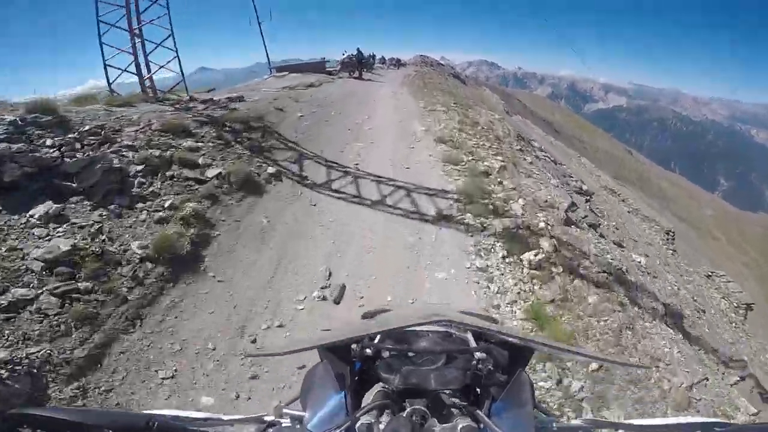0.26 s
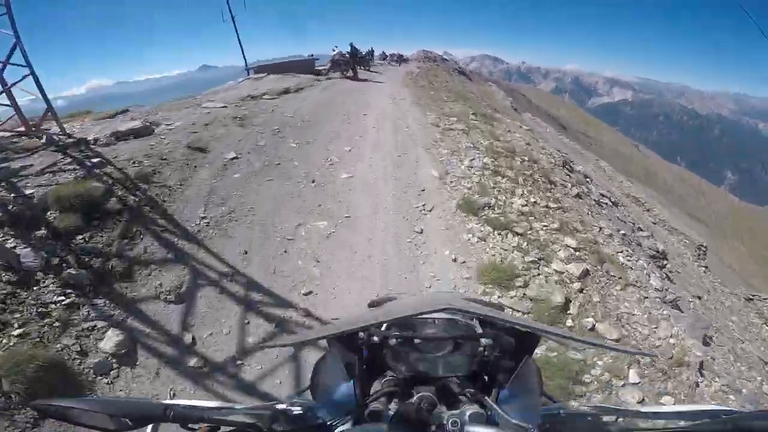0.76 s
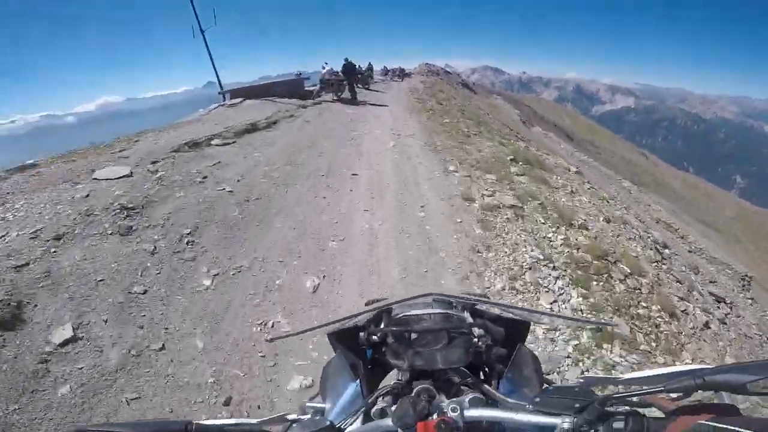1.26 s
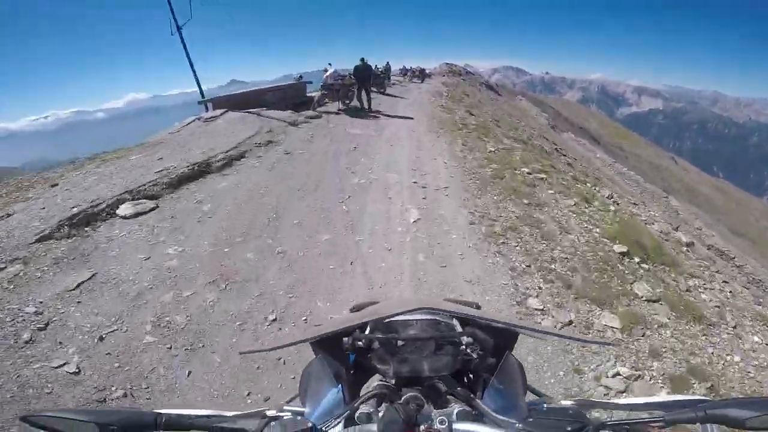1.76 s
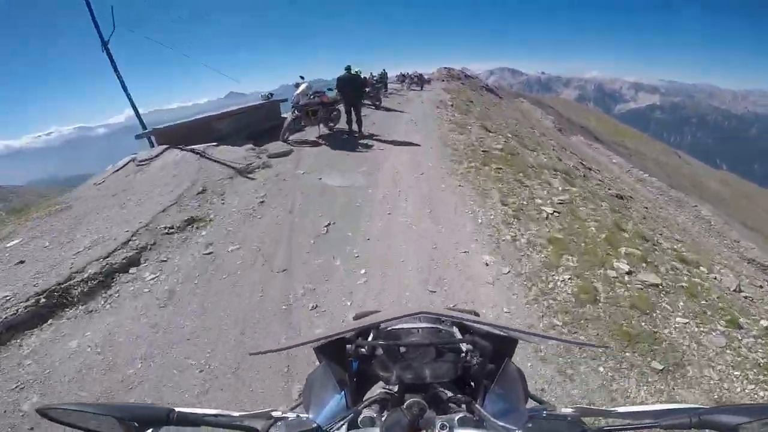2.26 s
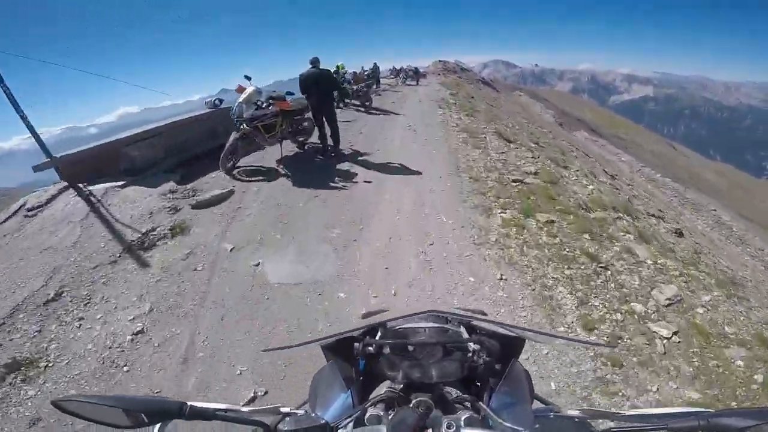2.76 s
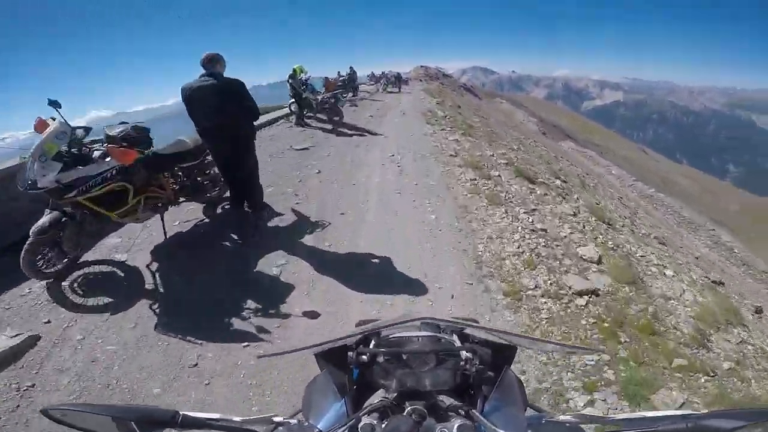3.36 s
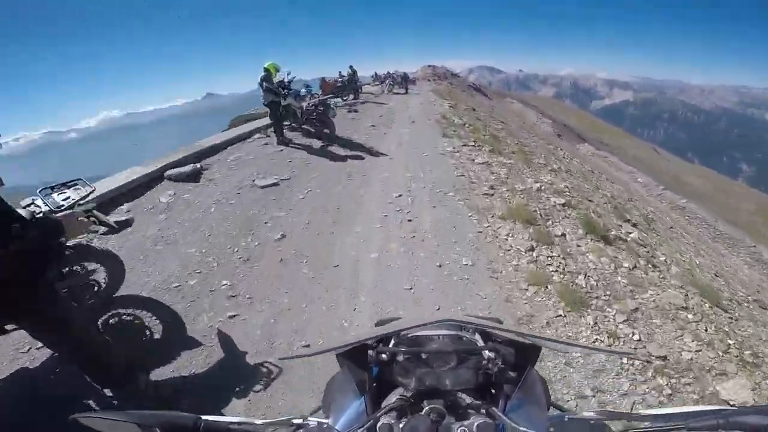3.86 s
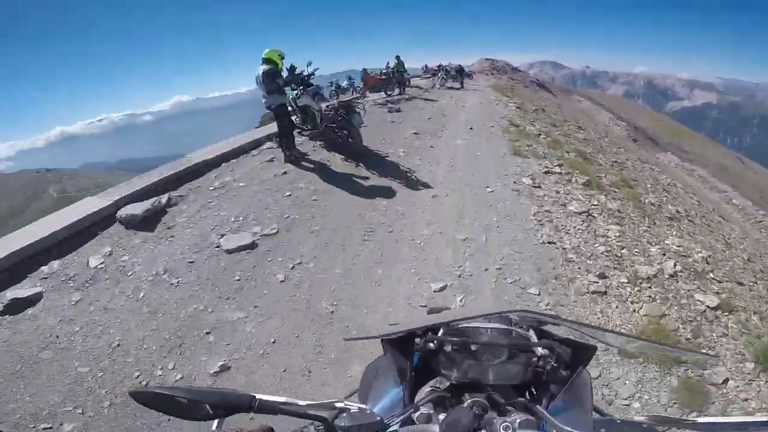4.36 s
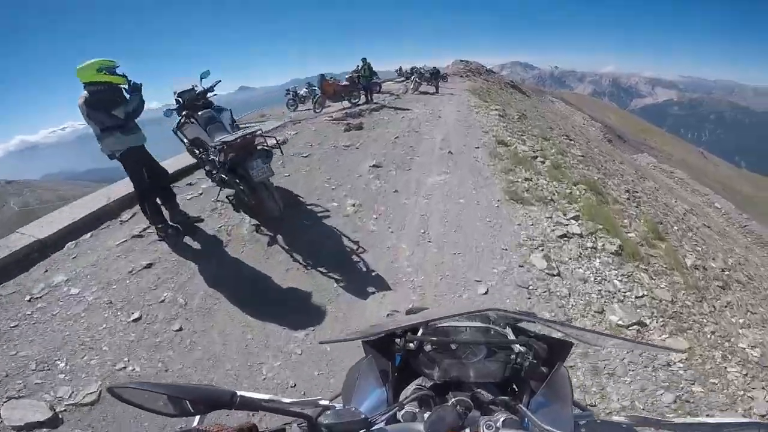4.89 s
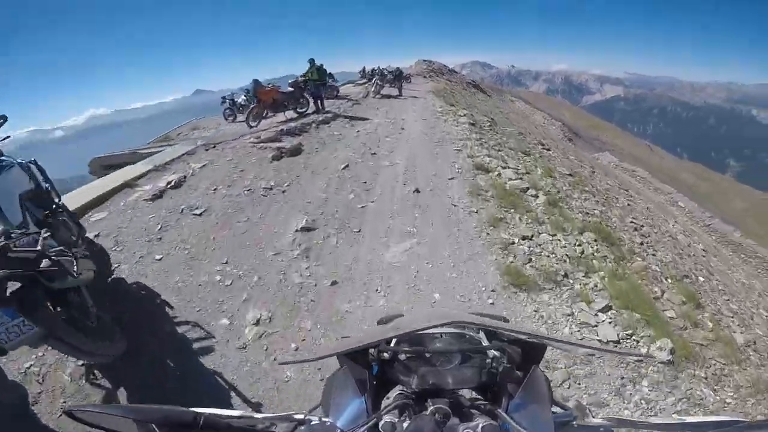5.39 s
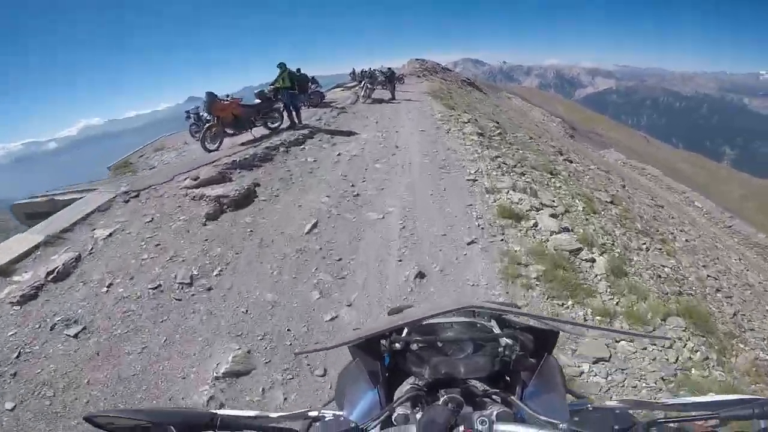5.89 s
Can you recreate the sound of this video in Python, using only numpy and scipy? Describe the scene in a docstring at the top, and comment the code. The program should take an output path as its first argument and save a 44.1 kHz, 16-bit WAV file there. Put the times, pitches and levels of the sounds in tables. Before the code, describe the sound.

Close up from the rider's position outdoors, a motorcycle engine pulls at low, wavering revs as its tyres spray gravel and flick small stones. After one hollow knock, the revs fall gradually to a soft, chugging idle with ticking valves, before rising a little again. A light crunch of gravel and a low rumble of wind and tyres continue throughout.

```python
"""A motorcycle engine, heard from the rider's helmet, climbs a loose gravel track at low revs,
eases to idle and picks up again. Once a turn, exhaust and intake pulses excite the resonances of
silencer and airbox; valve impacts rattle the casing and the chain whirs at multiples of crank speed.
Gravel crunches under the tyres over a rumble of wind, a few stones click away, and the bike
knocks once as the throttle closes."""
import sys
import numpy as np
from scipy import signal
from scipy.fft import rfft, irfft
from scipy.io import wavfile
from scipy.ndimage import uniform_filter1d

SR = 44100
rng = np.random.default_rng(int(sys.argv[2]) if len(sys.argv) > 2 else 0)


def inscribe(sig):
    """Save sig as 16-bit PCM at rate SR to the path in sys.argv[1].

    A 1-D sig is mono; a 2-D sig holds one channel per row.
    Samples are clipped to [-1, 1] before scaling.
    """
    pcm = np.round(np.clip(np.atleast_2d(sig).T, -1, 1) * 32767)
    wavfile.write(sys.argv[1], SR, pcm.astype(np.int16))


N = 270333
T = np.arange(N) / SR
HZ = np.arange(N + 1) * SR / (2 * N) + 1e-6

# crank speed: t/s, f/Hz
CRANK_SPEED = [(0.0, 30.92), (0.13, 35.02), (0.25, 29.68), (0.43, 33.37), (0.64, 32.02), (0.9, 32.8),
               (1.46, 32.12), (1.56, 31.46), (1.8, 31.66), (2.03, 27.27), (2.36, 25.17), (2.97, 23.48),
               (3.19, 21.93), (3.45, 22.22), (3.82, 20.36), (5.11, 20.67), (5.47, 25.66), (6.13, 25.51)]
# resonances of the silencer (deep, barking) and airbox: f/Hz, bandwidth/Hz, level/dB, polarity
SILENCER_MODES = [(51.1, 10.45, 14, -1), (113, 29, 6.5, 1)]
BARK_MODES = [(193.5, 7.8, -3, -1), (233, 45, 11.5, 1), (288.4, 20, 1.5, 1), (354, 40, -6, 1)]
AIRBOX_MODES = [(42, 135.6, 6.18, 1), (108, 98.5, 3.44, -1)]
# valve gear blows in the two-turn cycle: position/turns, level/dB, decay/turns
VALVE_BLOWS = [(.1, -13, .12), (.5, -7, .15), (.78, -11, .12), (1.07, -11, .08), (1.48, 0, .14),
               (1.62, -4, .2)]
# resonances of the casing, steel parts, chain cover and knocked part: f/Hz, bandwidth/Hz, level/dB
CASING_MODES = [(933, 47, -6), (1117, 76, -15), (1525, 118, 3), (2070, 230, -4.5)]
STEEL_MODES = [(2780, 210, 3), (3846, 290, 1.5), (4130, 43, 3), (4497, 290, 3.5), (4970, 55, 5.5),
               (5330, 39, -2), (6050, 250, -0.5), (6630, 670, -4.5), (9670, 660, -12)]
COVER_MODES = [(486, 30, 0)]
HOLLOW_MODES = [(775, 130, -1), (900, 70, 9), (983, 35, 12), (1150, 84, -26)]
# chain meshing tones: multiple of crank speed, level/dB
CHAIN_ORDERS = [(20, -11), (21, 0), (22, -2), (42, 9), (60, 8)]
# spectra of exhaust gas, engine casing, gravel, and wind with tyre rumble: f/Hz, level/dB
GAS_SPECTRUM = [(200, -1), (330, -0.5), (420, -6.5), (520, 1), (640, -11.5), (800, -13), (1500, -22),
                (2800, -20.5), (5000, -39), (12000, -49)]
CASING_SPECTRUM = [(200, 3.5), (390, -2.5), (560, 2), (780, -6.5), (980, 2), (1300, -2), (1550, -3),
                   (2150, -6), (2400, -14), (4000, -16), (6500, -18.5), (9000, -35.5), (14000, -52)]
GRAVEL_SPECTRUM = [(300, 11.5), (900, 4.5), (2000, 6), (2800, -0.5), (3900, 5), (4700, -8), (5600, -1.5),
                   (6600, 1.5), (8000, -11), (10000, -12), (11200, -21), (13500, -22), (15000, -36)]
RUMBLE_SPECTRUM = [(12, 0), (25, -1), (70, -3), (150, -8), (220, -10), (320, -18), (500, -28), (1500, -48),
                   (6000, -90)]
# stones flung by the tyres, and a dull thunk at 0.51 s: t/s, relative peak level/dB, f/Hz, decay/s
SHORT_CRACKS = [(0.035, -22, 4960, 0.0056), (0.078, -31, 5270, 0.0046), (.097, -35, 5000, 0.0034),
                (0.1148, -22.5, 4700, 0.0057), (0.129, -35, 3960, .004), (0.509, -25, 1240, 0.003),
                (.895, -27, 1200, 0.0015), (1.365, -28, 4360, 0.0055), (3.087, -42, 4470, 0.0024)]
# a hollow knock and its rebounds: t/s, relative level/dB
KNOCK_IMPACTS = [(1.7924, 9), (1.7981, -1), (1.804, 8.5), (1.8137, -3)]
# level laws: idle level/dB, revs slope/(dB/Hz), acceleration slope/(dB s/Hz), overrun gain/dB
THROB_LAW = (-19.0, 0.2585, .1, -0.47)
BARK_LAW = (-34, 0.47, 0.0469, 0.63)
INTAKE_LAW = (-4.5, 0.69, -0.13, .8)  # relative to the exhaust
CLATTER_LAW = (-34.5, 0.1619, 0.0557, 1.1)
CHAIN_LAW = (-43, -0.07, 0.14, 4)
GRAVEL_LAW = (-42, 0.4062, 0.0532, -0.7)

IDLE_HZ = 20.5
OVERRUN_HZ_PER_S = 2.7  # the wheel drives the engine fully once the revs fall this fast
THROTTLE_S, CHAIN_SLACK_S = 0.33, 0.483  # time for the throttle to act and the slack to change
SCATTER_DB, JITTER_S, UNEVEN_DB_PER_HZ = 1.05, .00028, -.35  # firings steady as the revs rise
WAVER_TURNS_PER_HZ, WAVER_PER_S = .0011, 9  # bumps make the crank run ahead and fall back
SPRAY_DB, SPRAY_SHAKE_DB = 1.5, 5  # wheel slip sprays gravel and jolts the casing


def undb(db):
    """Amplitude ratio of a level in decibels."""
    return 10 ** (np.asarray(db) / 20)


def unit(x):
    """Normalisation to rms 1."""
    return x / np.sqrt(np.mean(x ** 2))


def even(x):
    """Normalisation to a running rms of 1, over about a quarter second."""
    return x / np.sqrt(uniform_filter1d(uniform_filter1d(x ** 2, SR // 5), SR // 5))


def noise():
    """Gaussian white noise."""
    return rng.standard_normal(N)


def wander(per_s):
    """Linear interpolation between random values, at rms 1."""
    return unit(np.interp(T * per_s, np.arange(8192), rng.standard_normal(8192)))


def swell(middle_s, half_s):
    """Gaussian pulse of height 1."""
    return np.exp(-((T - middle_s) / half_s) ** 2)


def impulses(times, sizes):
    """Superposition of impulses at the given times."""
    return np.bincount((np.clip(times, 0, None) * SR).astype(int), sizes, N)[:N]


def through(x, response):
    """Linear filtering: the spectrum is multiplied by a frequency response."""
    return irfft(rfft(x, 2 * N) * response)[:N]


def colour(spectrum):
    """Response interpolated in level against log frequency."""
    hz, db = np.transpose(spectrum)
    return undb(np.interp(np.log(HZ), np.log(hz), db))


def modes(table):
    """Modal superposition: the summed response of damped resonators."""
    return sum(np.sign(np.prod(polarity)) * undb(db) / (1 + 1j * (HZ ** 2 - hz ** 2) / (width * HZ))
               for hz, width, db, *polarity in table)


def soft_push(hz):
    """Two-pole low-pass response: a force spread over time carries little treble."""
    return 1 / (1 + 1j * np.sqrt(2) * HZ / hz - (HZ / hz) ** 2)


def rolloff(hz, power):
    """Zero-phase low-pass response, at half amplitude at hz."""
    return 1 / (1 + (HZ / hz) ** power)


def acceleration(crank_hz, span_s):
    """Smoothed derivative of crank speed, in Hz/s."""
    return uniform_filter1d(np.gradient(crank_hz) * SR, int(span_s * SR) + 1)


def level_db(law, drive):
    """Level as a linear function of revs above idle, acceleration and overrun."""
    idle_db, *slopes = law
    return idle_db + sum(slope * control for slope, control in zip(slopes, drive))


def strokes(turns, offset_turns, uneven):
    """Quasi-periodic excitation: one impulse a turn, scattered in time and size."""
    scatter = rng.standard_normal((200, 2))
    times = np.interp(np.arange(1, len(scatter) + 1) + offset_turns, turns, T, right=99)
    late, strong = scatter.T * np.interp(times, T, uneven)
    return impulses(times + JITTER_S * late, undb(SCATTER_DB * strong))


def exhaust_and_intake(turns, drive):
    """Cavity resonance: each firing rings the silencer; later in the turn the intake rings the airbox."""
    revs, _, _ = drive
    uneven = undb(UNEVEN_DB_PER_HZ * revs)
    firing = strokes(turns, 0.0031, uneven)
    gulp = strokes(turns, -.38, uneven / 2) * undb(level_db(INTAKE_LAW, drive))
    silencer = through(firing, modes(SILENCER_MODES) * soft_push(680))
    airbox = through(gulp, modes(AIRBOX_MODES) * soft_push(264))
    # small openings radiate the deepest notes poorly, and the silencer's packing absorbs the high ones
    throb = through(silencer + airbox, rolloff(270, 10) / (1 + (33 / HZ) ** 4))
    bark = through(firing + undb(-11) * gulp, modes(BARK_MODES) * soft_push(396) * rolloff(385, 10))
    stumble_db = -1.5 * swell(middle_s=2, half_s=.08)  # the engine stumbles as the throttle shuts
    throb_db = level_db(THROB_LAW, drive) + stumble_db
    return even(throb) * undb(throb_db) + even(bark) * undb(level_db(BARK_LAW, drive))


def gas_rush(turns, drive):
    """Flow noise: gas rushes out after each firing, growing faster than the bark with the throttle."""
    puff = np.exp(-(turns % 1) / 2.6)
    rush = unit(through(puff * noise(), colour(GAS_SPECTRUM)))
    return rush * undb(-35 + 2.76 * (level_db(BARK_LAW, drive) + 29))


def valve_beat(turns):
    """Exponential decay of uneven valve gear blows: an envelope that recurs every second turn."""
    beat = undb(-3.5)
    for position, db, decay in VALVE_BLOWS:
        cycle, since = np.divmod(turns - position + 2, 2)
        size = undb(db + 1.5 * rng.standard_normal(256))
        beat = beat + size[cycle.astype(int)] * np.exp(-since / decay)
    return unit(uniform_filter1d(beat, SR // 250))  # each blow takes 4 ms to build


def valve_clatter(beat):
    """Impact excitation: the blows ring the modes of the casing and of bright steel parts."""
    rattle = beat * noise() * undb(0.68 * wander(700))
    casing = through(rattle, colour(CASING_SPECTRUM) * (1 + modes(CASING_MODES)))
    steel = through(beat ** 0.95 * noise(), modes(STEEL_MODES) * soft_push(10700) * rolloff(10300, 10))
    return unit(casing) + undb(-12.5) * unit(steel)


def chain_whir(turns, beat):
    """Forced vibration: links meet the sprocket and drive the cover; slack makes the tones waver."""
    mesh = sum(undb(db + 3 * wander(35)) * np.sin(2 * np.pi * order * turns + .75 * wander(28))
               for order, db in CHAIN_ORDERS)
    return even(through(mesh * beat, modes(COVER_MODES)))


def gravel_crunch():
    """Shot noise: thousands of grains crack under the tyres, in patches, over a hiss of dust."""
    when, strength, side = rng.random((9000, 3)).T
    sizes = undb(-3 * np.log(np.maximum(strength, .01))) * np.sign(side - .5)
    grains = unit(impulses(when * N / SR, sizes))
    dust = undb(9.5) * noise()
    patches = undb(0.93 * wander(30))
    return unit(through((grains + dust) * patches, colour(GRAVEL_SPECTRUM)))


def rumble():
    """Amplitude-modulated noise: the low rumble of wind and tyres slowly rises and falls."""
    return unit(through(noise(), colour(RUMBLE_SPECTRUM))) * undb(-35 + 2 * wander(5))


def stone_clicks():
    """Damped resonance: each flung stone, and the dull thunk, gives a short gritty crack around its own pitch."""
    clicks = 0
    for start_s, db, hz, decay_s in SHORT_CRACKS:
        age = np.maximum(T - start_s, 0)
        crack = noise() * (1 - np.exp(-age / .0005)) * np.exp(-age / decay_s)
        body = modes([(hz, .35 * hz, 0), (1.8 * hz, .25 * hz, -12)]) * rolloff(2.1 * hz, 8)
        ring = through(crack, body)
        clicks = clicks + ring / np.abs(ring).max() * undb(db + 8)
    return clicks


def knock():
    """Impulse response: a loose part rings hollowly as it hits its stop and rebounds."""
    times, db = np.transpose(KNOCK_IMPACTS)
    ring = through(impulses(times, undb(db)), modes(HOLLOW_MODES) * soft_push(740))
    return -ring / np.abs(ring).max() * undb(-6.5)


def scene():
    """Superposition at the rider; crank speed and its changes govern engine, chain and gravel levels."""
    crank_hz = np.interp(T, *np.transpose(CRANK_SPEED))
    revs = crank_hz - IDLE_HZ
    overrun = np.clip(-acceleration(crank_hz, CHAIN_SLACK_S) / OVERRUN_HZ_PER_S, 0, 1)
    drive = revs, acceleration(crank_hz, THROTTLE_S), overrun
    turns = np.cumsum(crank_hz) / SR + .5 + WAVER_TURNS_PER_HZ * revs * wander(WAVER_PER_S)
    spray = swell(middle_s=0.075, half_s=0.072)  # the rear wheel slips
    beat = valve_beat(turns)
    exhaust = exhaust_and_intake(turns, drive) + gas_rush(turns, drive)
    clatter = valve_clatter(beat) * undb(level_db(CLATTER_LAW, drive) + SPRAY_SHAKE_DB * spray)
    chain = chain_whir(turns, beat) * undb(level_db(CHAIN_LAW, drive))
    gravel = gravel_crunch() * undb(level_db(GRAVEL_LAW, drive) + SPRAY_DB * spray)
    return (exhaust + clatter + chain + gravel + stone_clicks() + knock() + rumble())[None]


def record(dry):
    """Band limiting: an elliptic low-pass removes the treble above 14.5 kHz."""
    return signal.sosfilt(signal.ellip(8, .2, 80, 14500, fs=SR, output="sos"), dry)


dry = scene()
out = record(dry)
inscribe(out)
```